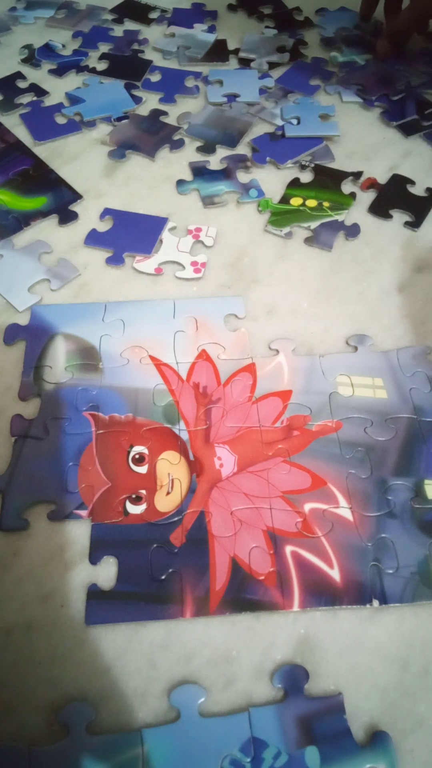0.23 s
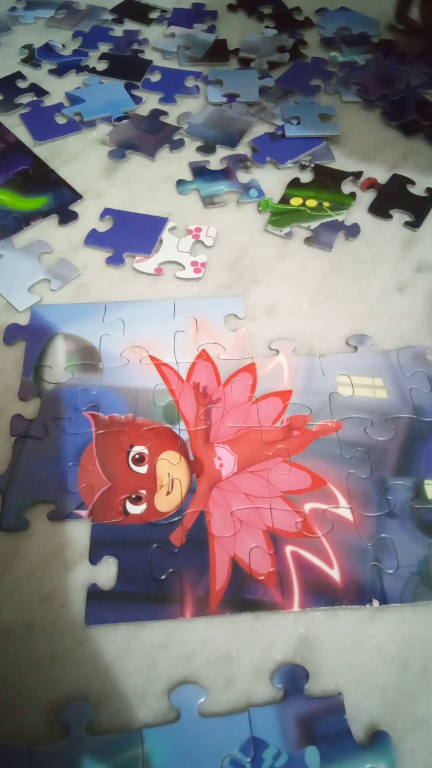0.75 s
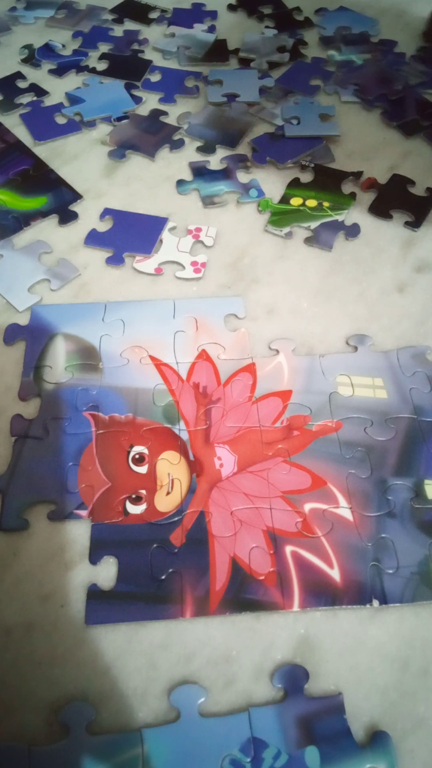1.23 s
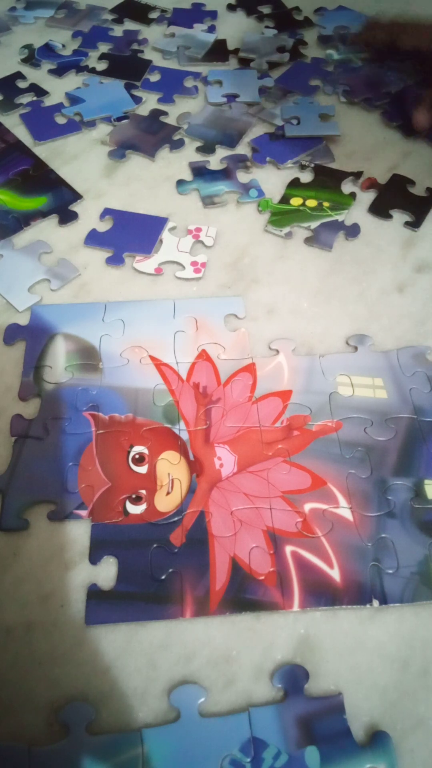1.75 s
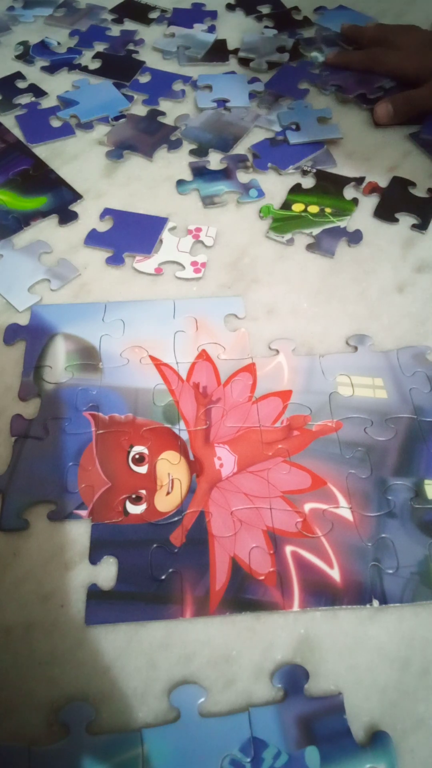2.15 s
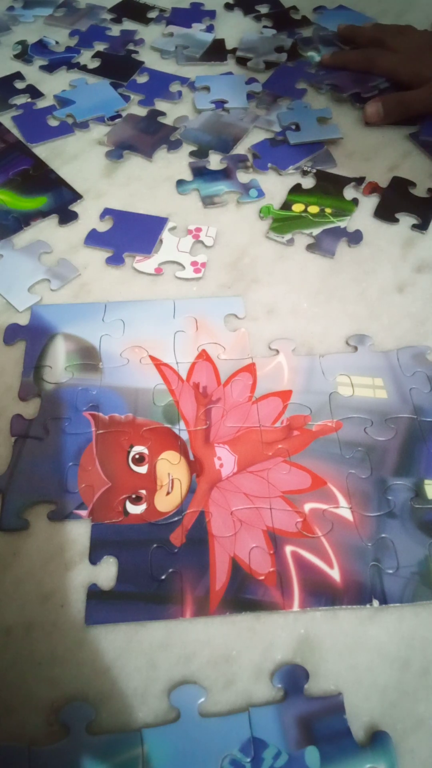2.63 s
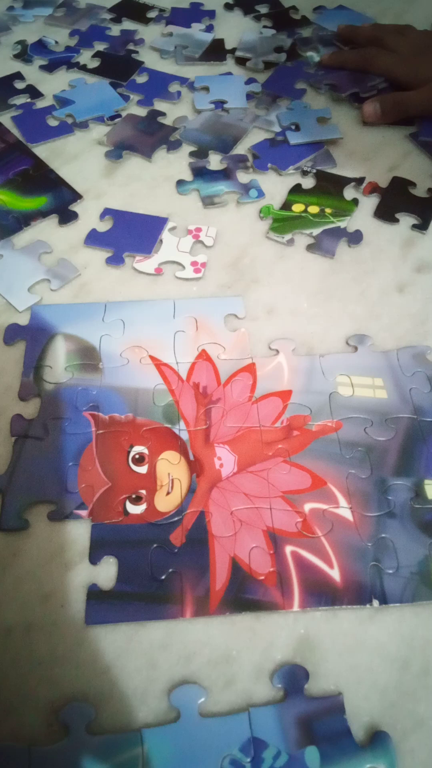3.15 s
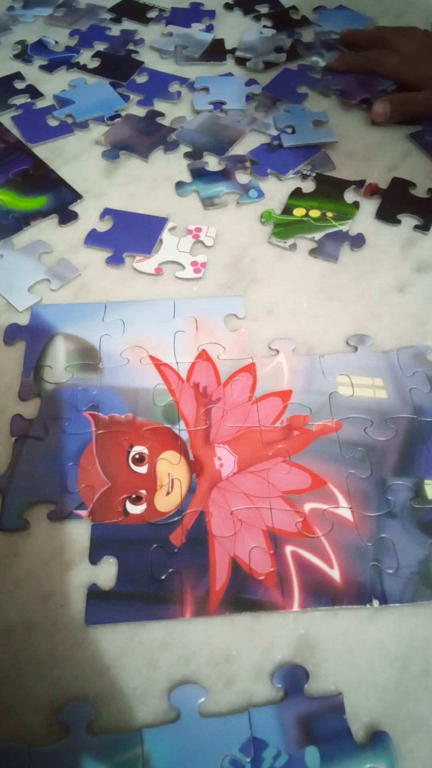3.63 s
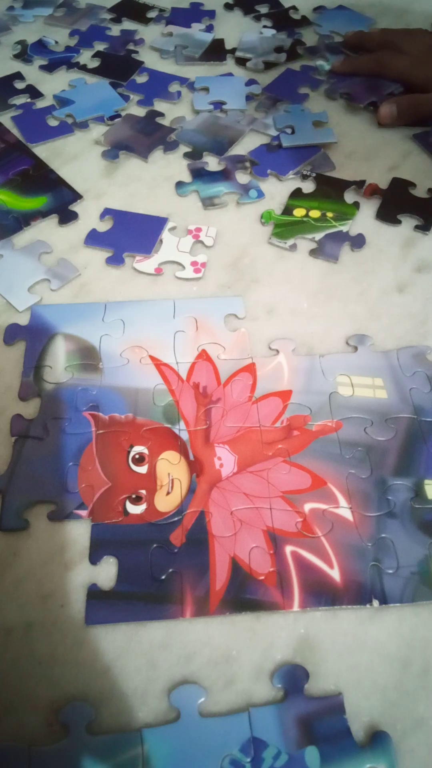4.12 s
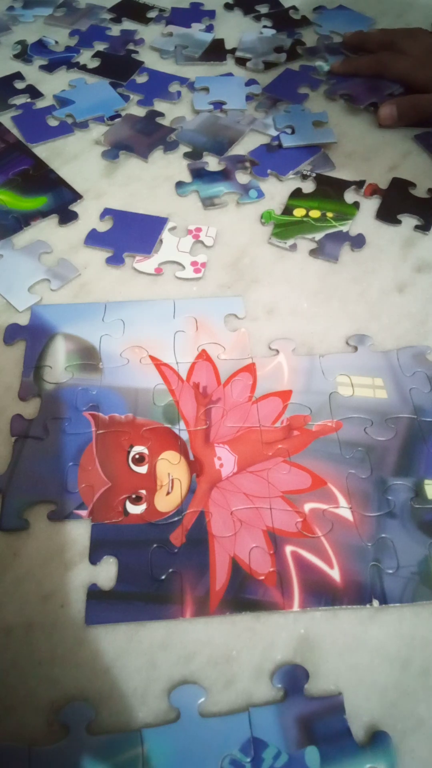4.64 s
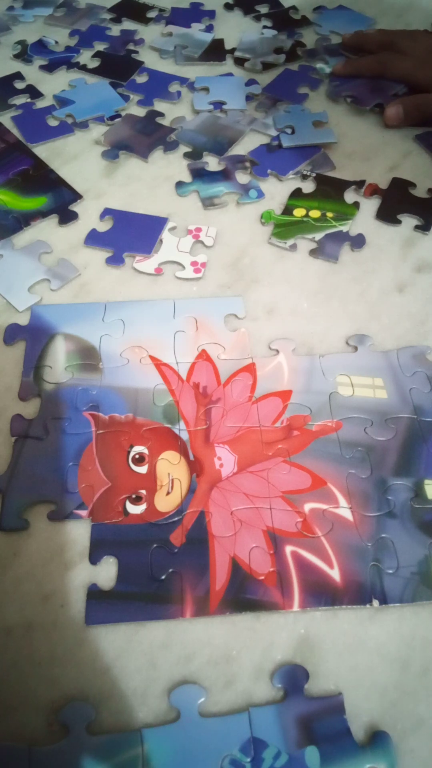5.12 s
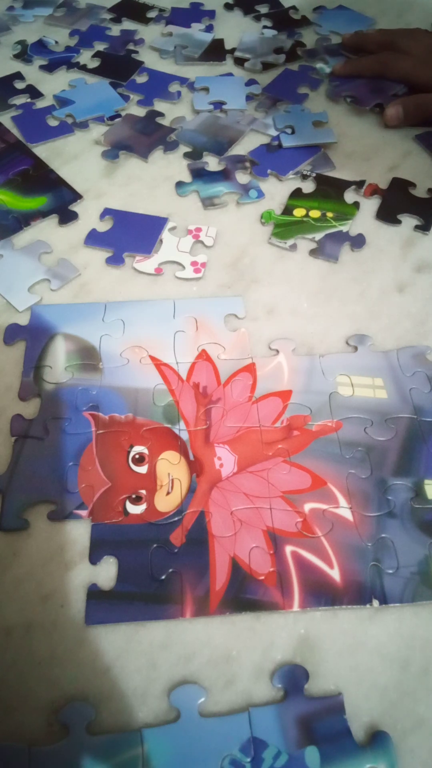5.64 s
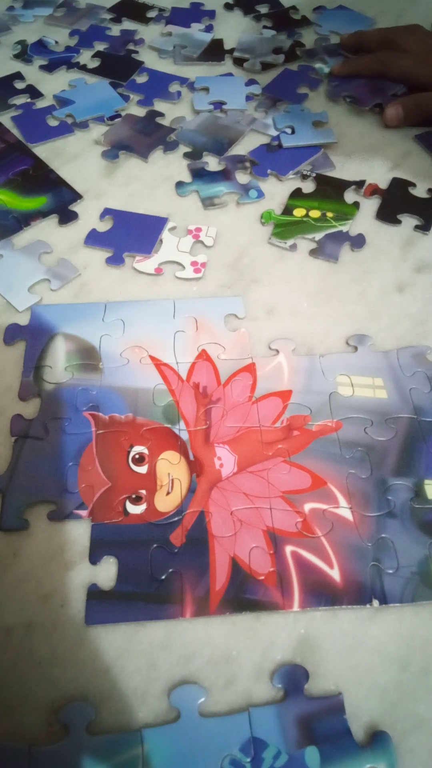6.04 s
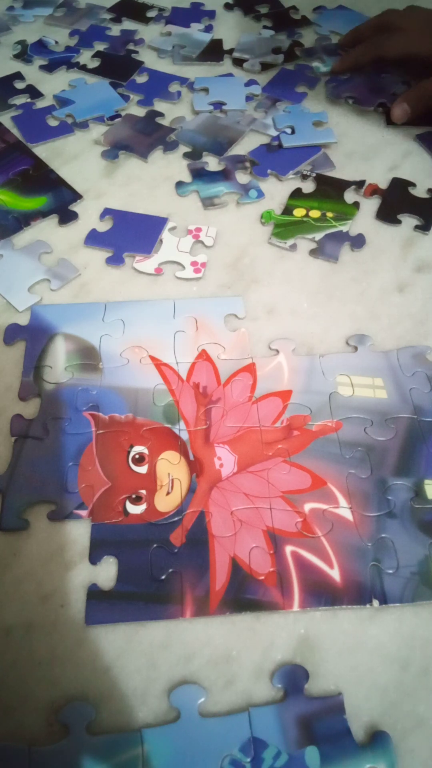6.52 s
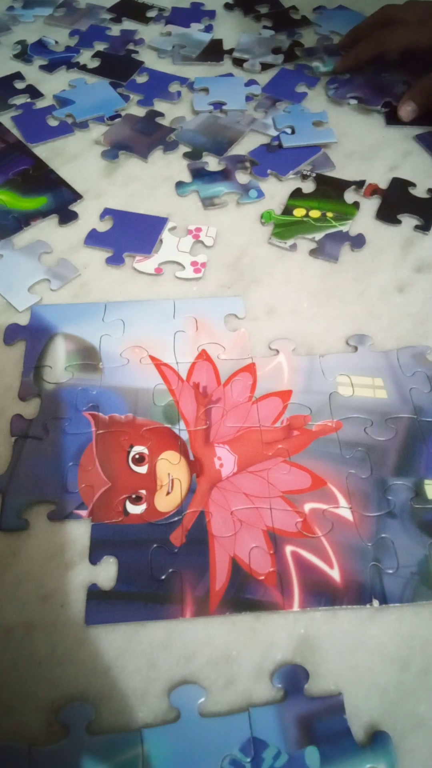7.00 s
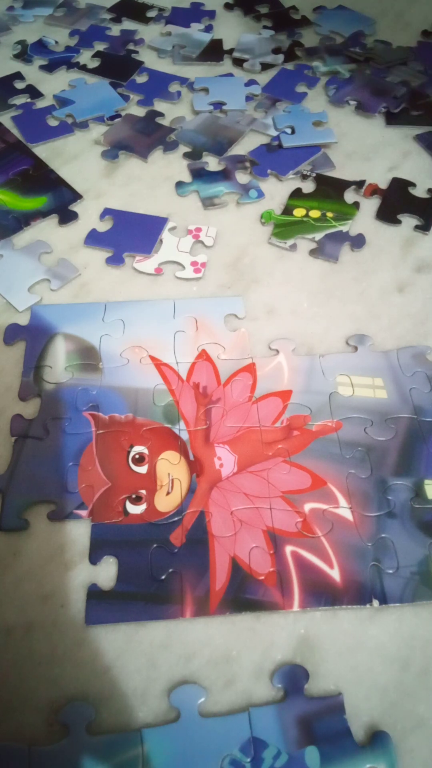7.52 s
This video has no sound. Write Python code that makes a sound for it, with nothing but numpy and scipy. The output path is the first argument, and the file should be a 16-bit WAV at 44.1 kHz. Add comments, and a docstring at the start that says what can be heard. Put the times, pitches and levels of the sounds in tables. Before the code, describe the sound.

A hand slides cardboard puzzle pieces over a hard floor with airy rustles and small ticks, then several knocks, one sharp and loud.

```python
"""A hand sorts cardboard puzzle pieces on a hard tile floor in a quiet room.
Throughout: drifting rumble and hiss (shaped noise), airy sliding (noise of tiny slips, stroke by stroke), ticks
(short band noise). From 0 s a soft knock (ringing card modes) and a faint tone (narrow noise) gone by 2.6 s;
at 2.0-2.4 s a soft sinking whistle; from 3.5 s drags scrape and knocks gather, hardest at 5.54 s;
after 6.2 s only sliding and ticks remain over the room. Knocks and ticks echo."""
import sys
import numpy as np
from scipy import signal
from scipy.fft import rfft, irfft
from scipy.io import wavfile
from scipy.ndimage import uniform_filter1d

SR = 44100
rng = np.random.default_rng(int(sys.argv[2]) if len(sys.argv) > 2 else 0)


def master_out(mix):
    """Clip the mix to full scale and print it as 16-bit PCM to the path in sys.argv[1]."""
    frames = np.transpose(np.atleast_2d(mix))
    ceiling = np.clip(frames, -1, 1)
    pcm = np.round(ceiling * 32767).astype(np.int16)
    wavfile.write(sys.argv[1], SR, pcm)


N = 342260

# Room noise spectrum: f/Hz, relative density/dB
ROOM_SPECTRUM = [(24, -53.5), (40, -3), (64, -3.5), (123, -0.5), (166, -5), (248, -13.5), (282, -13),
                 (311, -13), (344, -20.5), (380, -19.5), (676, -28), (728, -26.5), (1090, -30.5),
                 (2880, -39), (15800, -49)]
HISS_DB = -72.5
# Rumble drift: t/s, level/dB
RUMBLE_DRIFT = [(0, -57.5), (1.2, -57), (2, -57), (2.8, -60), (3.9, -57), (4.7, -59), (5.8, -60),
                (6.6, -58.5), (7.76, -57.5)]
# Faint tone, swelling and dying away: t/s, level/dB
TONE_SWELL = [(0, -94), (.8, -82.5), (2.3, -81), (2.6, -98)]
# Partials of the tone: multiple of TONE_HZ, relative level/dB
TONE_PARTIALS = [(1, -37), (2, 2), (3, 1), (4, -18)]
TONE_HZ, TONE_WIDTH_HZ = 313.7, 16.0

# Echo tail by band: f/Hz, t60/s, relative level/dB
ECHO_BANDS = [(149.5, 0.36, 16.5), (300, 0.37, -7), (660, 0.32, 5.5), (1500, 0.47, -2.5),
              (2600, 0.46, -4.5), (4040, 0.5, -2), (8300, 0.24, -4.5)]
# First reflections: delay/s, level/dB
WALLS = [(.011, -17.5), (.022, -9.5), (0.03, -24)]
WALL_LOWPASS_HZ = 2600

# Edges catching: t/s, level/dB, f/Hz, bandwidth per pass/f, dull tap re edge/dB
EDGE_TICKS = [(0.558, -67, 12000, .8, -30), (0.789, -52.5, 9200, 0.82, -21), (1.004, -65, 6200, .6, -12),
              (1.521, -42, 6600, 0.58, -17.5), (1.543, -55, 5600, .35, -30), (1.568, -70, 5200, .5, 5),
              (1.988, -67, 3500, .5, 7), (2.004, -47, 9650, .15, -18), (2.168, -50, 12000, 0.41, -30),
              (3.71, -58, 4000, .95, -8), (3.724, -61, 12500, .49, -30), (3.792, -46, 3950, 0.49, -22),
              (3.840, -61, 13000, .3, -30), (3.9586, -36.5, 11200, 0.35, -4.5),
              (4.128, -59, 13000, 0.76, -30), (4.194, -71, 6000, 0.9, 7), (4.237, -68.5, 6000, .8, 13),
              (4.255, -64, 3500, .8, -10), (4.826, -63, 5040, .95, -10), (5.426, -75, 5000, .9, 11),
              (6.681, -58, 13200, 0.75, -30), (7.168, -62.5, 7030, .45, 1), (7.237, -55, 3900, .45, -14),
              (7.255, -66, 3900, .45, -14), (7.312, -61, 8500, .4, -27), (7.656, -53, 12800, .4, -35),
              (7.672, -48.5, 12800, 0.49, -2.3), (7.689, -69, 9000, .6, 13), (7.701, -65, 9000, .6, 8),
              (7.721, -61.5, 9000, .6, 5)]
TICK_LEAD_S, TICK_RISE_S, TICK_T60_S = .01, 0.00088, 0.014
TAP_HZ, TAP_SHARE = 2380, 1
TICK_ECHO_DB = -6

# Pieces dragged flat: full speed t/s, rise/s, hold/s, fall/s, level/dB, weight re level/dB, ring re level/dB
DRAGS = [(3.514, .04, 0.036, 0.043, -71, -16, -9), (3.70, 0.013, 0.0046, 0.031, -69, 1, -14),
         (3.957, 0.025, .002, 0.018, -57.5, -17, -11), (4.243, 0.13, 0.018, 0.033, -72.5, 2, -21),
         (4.992, .05, .005, 0.06, -73, 3, -16), (5.39, 0.11, 0.088, 0.13, -70, 3.5, -26),
         (5.637, 0.043, .005, 0.12, -61, 1, -13), (5.785, 0.1, 0.025, 0.068, -57, 4, -5),
         (5.922, 0.079, .03, 0.052, -59, -1.5, -9.5), (6.02, 0.056, 0.078, 0.062, -67, 0.5, -8)]
# Scrape spectrum: f/Hz, relative density/dB
SCRAPE_SPECTRUM = [(500, -33.5), (1000, -8.5), (1600, -5.5), (2150, -11.5), (2800, -30), (4200, -38)]
# Dull scrape under the hand's weight: f/Hz, relative density/dB
WEIGHT_SPECTRUM = [(150, 4), (300, 3.5), (500, 4), (800, -13), (1300, -26)]
# Whistle of the gap under a piece, sinking as it closes: t/s, f/Hz, level/dB
GAP_WHISTLE = [(1.96, 2320, -73), (2.2, 2020, -79), (2.35, 1860, -75), (2.4, 1860, -85)]
RING_HZ, RING_WIDTH_HZ, WHISTLE_WIDTH_HZ = 5000, 800, 240.0  # widths per pass

# Sliding strokes: full speed t/s, rise/s, hold/s, fall/s, hiss level/dB, lower hiss re hiss/dB
STROKES = [(0.094, 0.11, .03, .08, -76, -4), (0.644, .07, .005, 0.045, -67.5, -12),
           (.705, .04, .005, .04, -69, -15), (0.796, .021, .005, .1, -68.5, -7.5),
           (1.174, 0.23, .005, .11, -69.5, -5.5), (1.272, 0.12, 0.024, 0.084, -61.5, -14),
           (1.538, 0.046, 0.0054, 0.095, -67, -3), (1.707, 0.12, .04, 0.16, -60.5, -13.5),
           (1.997, 0.093, .011, 0.097, -57, -11), (2.076, .05, 0.026, 0.086, -61, -11.5),
           (2.188, 0.065, 0.1, 0.12, -53, -14), (2.57, 0.21, 0.073, 0.18, -69, -10.5),
           (2.82, 0.16, .05, 0.14, -60, -11), (2.997, 0.15, 0.081, 0.15, -61, -11),
           (3.23, 0.066, 0.097, 0.087, -66, -10), (3.466, 0.077, 0.058, 0.064, -66, -18),
           (3.69, .04, .04, .04, -73, -16), (3.78, .03, .011, 0.1, -83, -7),
           (3.96, .022, 0.0025, 0.0071, -45, -6.5), (3.977, 0.031, 0.0045, .09, -73, 3.5),
           (4.19, 0.084, .07, .04, -77, -5), (4.633, 0.046, 0.2, .11, -75.5, -5),
           (4.986, 0.064, .005, 0.12, -66.5, -6.5), (5.342, .05, 0.031, .06, -73.5, -9),
           (5.473, .05, .005, 0.071, -66.5, -4), (5.558, 0.023, 0.00487, 0.043, -65.5, 0),
           (5.632, 0.034, .005, 0.035, -63.5, -1), (5.78, 0.19, 0.036, 0.043, -61, -4.5),
           (5.913, .05, 0.045, 0.039, -63.5, -5.5), (6.017, .03, 0.055, 0.083, -69, -4),
           (6.14, .021, .005, .08, -70.5, -9), (6.356, 0.23, 0.019, 0.15, -66, -5.5),
           (6.703, 0.036, .005, 0.1, -59.5, -16), (6.828, 0.088, 0.025, .12, -59, -14),
           (7.25, 0.096, 0.14, 0.14, -68, -9.5), (7.5, 0.054, 0.046, .09, -77, -15),
           (7.64, .022, .13, .11, -60, -13.5)]
# Restless hand between strokes: t/s, hiss level/dB
RESTLESS_HISS = [(0, -80), (.9, -81), (1.42, -69.5), (2.42, -73.5), (3.35, -73.5), (3.65, -75.5),
                 (4.45, -78), (5.25, -75.5), (6.2, -72), (6.6, -72.5), (7.05, -76.5), (7.76, -75)]
# Light sliding hiss: f/Hz, relative density/dB
AIRY_SPECTRUM = [(5000, -27), (7500, -7), (10000, 2), (13000, 5.5), (15500, 7.5), (18000, -7)]
# Lower hiss under pressure: f/Hz, relative density/dB
PRESSED_SPECTRUM = [(1500, -17.5), (2800, -7.5), (4500, -7.5), (6500, -5.5), (9000, -12), (14000, -40)]
RESTLESS_PRESSURE_DB = -5.5  # lower hiss re restless hiss
SNAG_DB, SNAGS_PER_S, SNAG_DECAY_S = -1, 12, .002

# Pieces pressed or dropped: t/s, body peak level/dB, blow centre f/Hz, spread/octaves, mode pitch factor,
# edge crack re body peak/dB, echo send/dB (before SENT_DB)
KNOCKS = [(0.046, -53, 590, 0.22, 1.16, -35, 3.5), (3.689, -56.5, 1510, 1.2, 1.37, 3, -14),
          (3.7913, -35, 1030, 1.8, 1.087, -11.5, -1.9), (3.961, -47.5, 280, 0.21, 1.02, -40, -2),
          (4.276, -52.5, 900, 1.3, 0.86, -0.5, -3), (4.979, -54, 597, 0.67, 1.87, -22, -11),
          (5.2935, -33, 388, 0.75, 1.09, -23, -4), (5.344, -46, 635, 0.38, 1.1, -7, -3),
          (5.5384, -11.5, 1050, 1.7, 1.006, -22, -8), (5.6148, -31, 342, 1.46, 1.04, -29, -3.5),
          (5.808, -43.5, 353, 0.7, 0.91, -36, 1.5), (6.1140, -26.5, 436, 0.6, 0.88, -21.5, -0.5),
          (6.127, -21, 600, 0.99, 1.066, -20.5, -7.5)]
# Modes of card on tile: f/Hz (before pitch factor), relative level/dB, t60/s
CARD_MODES = [(95, -20, 0.17), (186, -2.5, 0.023), (305, 6, 0.078), (411, -9.5, 0.078), (494, 6.5, 0.039),
              (705, 3.5, 0.05), (837, 6.5, 0.01535), (958, 15, 0.011), (1237, 4, 0.04), (1477, 6, 0.024),
              (1918, 3.5, 0.026), (2166, 3.5, 0.027), (2550, 0.5, 0.014), (3080, -7.5, 0.015),
              (4260, -32.5, 0.012)]
CONTACT_S, CRACK_LOWPASS_HZ, CRACK_T60_S = 0.0008, 6950, 0.023
SENT_DB, SENT_T60_S = 4, 0.029

MIC_HIGHPASS_HZ, BAND_EDGE_HZ = 46.7, 15850
GAIN_STEP = 32  # samples per point of the stroke gains


def amp(db):
    """Converts decibels to gain."""
    return 10 ** (np.asarray(db) / 20)


def evened(x):
    """Scales to rms 1."""
    return x / np.sqrt(np.mean(x ** 2) + 1e-20)


def read(points, hz):
    """Interpolates a spectrum on a log-frequency axis."""
    f, value = np.transpose(points)
    return np.interp(np.log(hz + 1), np.log(f + 1), value)


def curve(rows):
    """Returns a gate with 20 ms fades outside the table's span, then its columns at every sample."""
    times, *columns = np.transpose(rows)
    t = np.arange(N) / SR
    to_edge = np.minimum(t - times[0], times[-1] - t)
    gate = np.clip(to_edge / .02 + 1, 0, 1)
    return gate, *(np.interp(t, times, c) for c in columns)


def add(mix, start_s, sound):
    """Mixes a sound in at a time."""
    part = mix[round(start_s * SR):][:len(sound)]
    part += sound[:len(part)]


def coloured(x, points):
    """Filters x by a spectrum, to rms 1."""
    hz = np.fft.rfftfreq(len(x), 1 / SR)
    return evened(irfft(rfft(x) * amp(read(points, hz)), len(x)))


def resonate(x, hz, width_hz):
    """One-pole resonance: shifts hz, fixed or moving, to zero, smooths, shifts back."""
    turn = np.exp(2j * np.pi * np.cumsum(hz * np.ones(len(x))) / SR)
    pole = np.exp(-np.pi * width_hz / SR)
    smooth = signal.lfilter([1 - pole], [1, -pole], x / turn)
    return 2 * (turn * smooth).real


def resonate_twice(x, hz, width_hz):
    """Two resonance passes for steeper skirts, to rms 1."""
    return evened(resonate(resonate(x, hz, width_hz), hz, width_hz))


def grit(spread_db, grain_s):
    """Friction noise: countless small slips of uneven size."""
    grain = max(round(grain_s * SR), 2)
    uneven = evened(uniform_filter1d(rng.standard_normal(N), grain))
    return rng.standard_normal(N) * amp(spread_db * uneven)


def strokes(rows):
    """Bell gain of each stroke, speeding up and slowing down: 20 dB over its rise and its fall."""
    full_s, rise_s, hold_s, fall_s, db = np.transpose(rows)[:5, :, None]
    t = np.arange(0, N + GAIN_STEP, GAIN_STEP) / SR
    early = np.maximum(full_s - t, 0) / rise_s
    late = np.maximum(t - full_s - hold_s, 0) / fall_s
    return amp(db - 20 * np.minimum(early + late, 4) ** 2)


def together(gains, added_db=0):
    """Sums strokes as power and reads the gain at every sample."""
    power = ((gains * amp(added_db).reshape(-1, 1)) ** 2).sum(0)
    return np.interp(np.arange(N) / GAIN_STEP, np.arange(len(power)), np.sqrt(power))


def room_tone():
    """Drifting rumble and steady microphone hiss, split from one noise; the tone is narrow, wavering noise."""
    noise = coloured(rng.standard_normal(N), ROOM_SPECTRUM)
    treble = signal.sosfiltfilt(signal.butter(1, 600, "high", fs=SR, output="sos"), noise)
    _, rumble_db = curve(RUMBLE_DRIFT)
    rumble = amp(rumble_db) * evened(noise - treble)
    hiss = amp(HISS_DB) * evened(treble)

    tone = np.zeros(N)
    for multiple, db in TONE_PARTIALS:
        tone += amp(db) * evened(resonate(rng.standard_normal(N), multiple * TONE_HZ, TONE_WIDTH_HZ))
    gate, tone_db = curve(TONE_SWELL)
    return rumble + hiss + gate * amp(tone_db) * tone


def echo(x):
    """First reflections, dulled by soft things, then sparse random-sign ones, each band decaying at its own rate."""
    taps = np.zeros(SR // 2)
    at = np.arange(300, len(taps) - 20, 20)
    taps[at + rng.integers(0, 20, len(at))] = rng.choice([-1., 1.], len(at))
    hz, t, bands = signal.stft(taps, SR, nperseg=256)
    table = np.array(ECHO_BANDS)
    t60_s = read(table[:, [0, 1]], hz)[:, None]
    db = read(table[:, [0, 2]], hz)[:, None]
    tail = signal.istft(bands * amp(db - 60 * t / t60_s), SR, nperseg=256)[1]
    tail = tail / np.linalg.norm(taps) * 4

    walls = sum(amp(d) * np.pad(x, (round(s * SR), 0))[:N] for s, d in WALLS)
    soft = signal.lfilter(*signal.butter(2, WALL_LOWPASS_HZ, fs=SR), walls)
    return signal.fftconvolve(x, tail)[:N] + soft


def ticks():
    """A catch is a burst of slips in the band where that edge rings, over the piece's dull tap."""
    out = np.zeros(N)
    t = np.arange(2000) / SR - TICK_LEAD_S
    shape = np.where(t < 0, np.exp(t / TICK_RISE_S), amp(-60 * t / TICK_T60_S))
    for time_s, db, hz, share, tap_db in EDGE_TICKS:
        slips = rng.standard_normal(len(t))
        edge = resonate_twice(slips, hz, share * hz)
        tap = resonate_twice(slips, TAP_HZ, TAP_SHARE * TAP_HZ)
        add(out, time_s - TICK_LEAD_S, amp(db) * (edge + amp(tap_db) * tap) * shape)
    return out


def dragging():
    """Rough slips of card on tile drive a scrape, a duller one under weight, a thin ring and the gap's whistle."""
    slips = grit(3.2, .007)
    scrape = coloured(slips, SCRAPE_SPECTRUM)
    heavy = coloured(slips, WEIGHT_SPECTRUM)
    ring = resonate_twice(slips, RING_HZ, RING_WIDTH_HZ)
    gate, whistle_hz, whistle_db = curve(GAP_WHISTLE)
    whistle = gate * amp(whistle_db) * resonate_twice(slips, whistle_hz, WHISTLE_WIDTH_HZ)

    gains = strokes(DRAGS)
    weight_db, ring_db = np.transpose(DRAGS)[5:]
    out = together(gains) * scrape
    out += together(gains, weight_db) * heavy
    out += together(gains, ring_db) * ring
    return out + whistle


def sliding():
    """Airy hiss of skin and card with tiny snags; pressing harder brings in lower hiss from the same slips."""
    catches = rng.random(N) < SNAGS_PER_S / SR
    snags = signal.lfilter([1], [1, -np.exp(-1 / (SNAG_DECAY_S * SR))], catches)
    slips = grit(0.8, 0.00305) * (1 + amp(SNAG_DB) * snags)

    gains = strokes(STROKES)
    rest = amp(curve(RESTLESS_HISS)[1])
    pressure_db = np.transpose(STROKES)[5]
    speed = np.hypot(together(gains), rest)
    pressure = np.hypot(together(gains, pressure_db), amp(RESTLESS_PRESSURE_DB) * rest)
    return speed * coloured(slips, AIRY_SPECTRUM) + pressure * coloured(slips, PRESSED_SPECTRUM)


def knocks():
    """A blow rings the card modes near its centre, plus an edge crack; returns direct sound and echo send."""
    out, sent = np.zeros(N), np.zeros(N)
    t = np.arange(4000) / SR
    hz, mode_db, t60_s = np.transpose(CARD_MODES)[:, :, None]
    sign = (-1.) ** np.arange(len(CARD_MODES))[:, None]
    crack_filter = signal.butter(1, CRACK_LOWPASS_HZ, fs=SR)
    for time_s, db, centre_hz, spread_oct, pitch, crack_db, echo_db in KNOCKS:
        mode_hz = hz * pitch
        off_centre = np.log2(mode_hz / centre_hz) / spread_oct
        reach_db = -20 * np.log10(1 + off_centre ** 2)
        decay = amp(mode_db + reach_db - 60 * t / t60_s)
        modes = (sign * decay * np.sin(2 * np.pi * mode_hz * t)).sum(0)
        body = modes * (1 - np.exp(-t / CONTACT_S))  # contact takes a moment to build
        noise = signal.lfilter(*crack_filter, rng.standard_normal(len(t)))
        crack = amp(crack_db - 60 * t / CRACK_T60_S) * noise
        hit = amp(db) * (body / abs(body).max() + crack)
        add(out, time_s, hit)
        # a shortened hit feeds the echo, so the tail rings less; echo level differs from knock to knock
        add(sent, time_s, amp(echo_db + SENT_DB - 60 * t / SENT_T60_S) * hit)
    return out, sent


def scene():
    """Knocks and ticks echo in the room, over friction and room tone."""
    knock, knock_sent = knocks()
    tick = ticks()
    reflected = echo(knock_sent + amp(TICK_ECHO_DB) * tick)
    mix = room_tone() + reflected + tick + dragging() + sliding() + knock
    return mix[None]


def record(dry):
    """Microphone bass roll-off, then the band limit."""
    highpass = signal.butter(4, MIC_HIGHPASS_HZ, "high", fs=SR, output="sos")
    heard = signal.sosfilt(highpass, dry)
    lowpass = signal.firwin(1023, BAND_EDGE_HZ, window=("kaiser", 9), fs=SR)
    return signal.oaconvolve(heard, lowpass[None], "same")


dry = scene()
out = record(dry)
master_out(out)
```